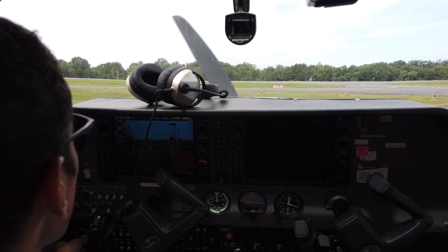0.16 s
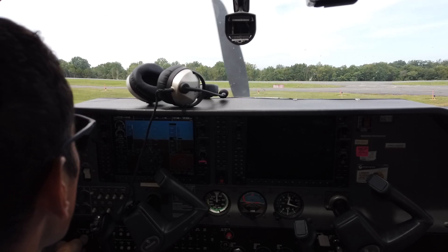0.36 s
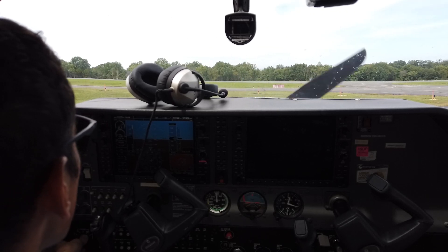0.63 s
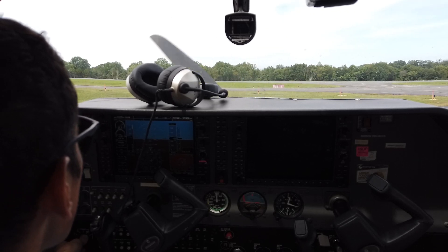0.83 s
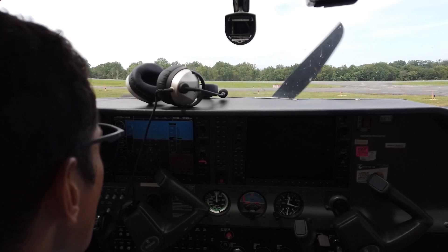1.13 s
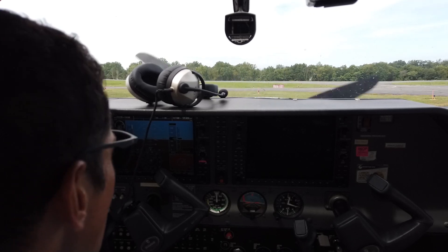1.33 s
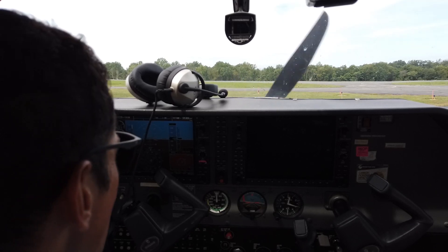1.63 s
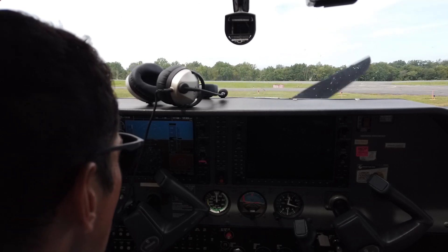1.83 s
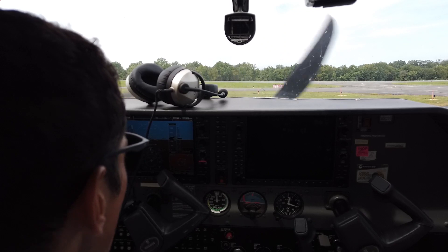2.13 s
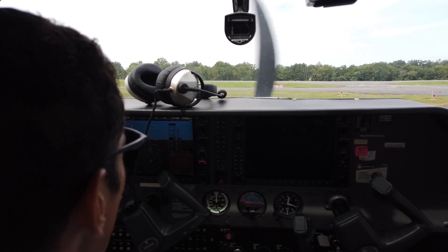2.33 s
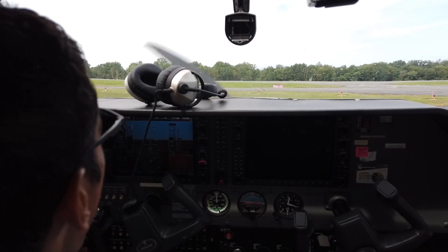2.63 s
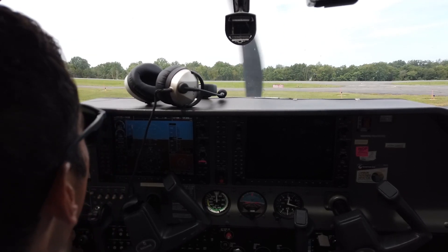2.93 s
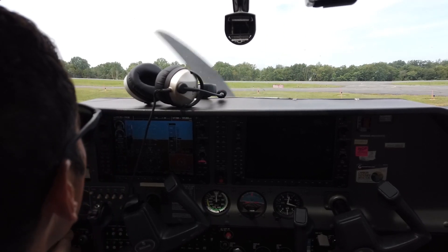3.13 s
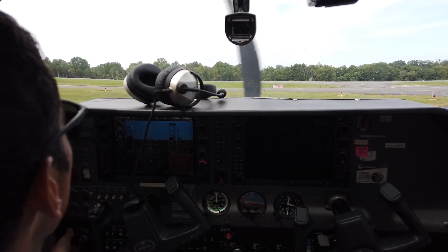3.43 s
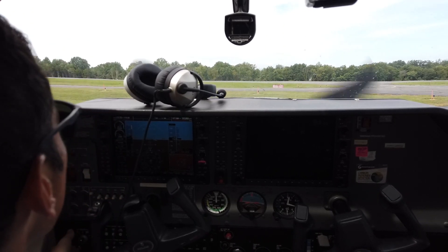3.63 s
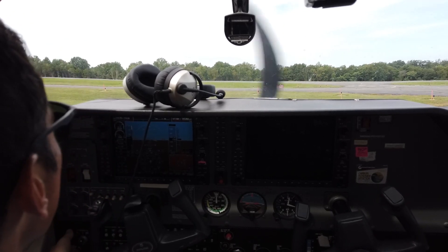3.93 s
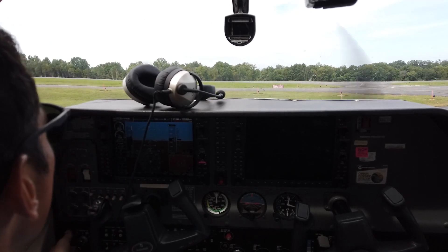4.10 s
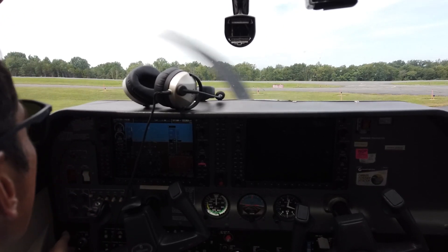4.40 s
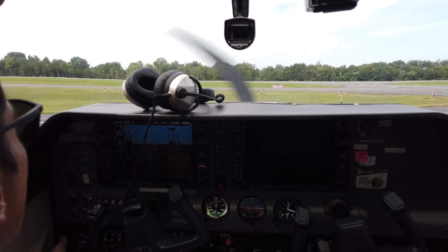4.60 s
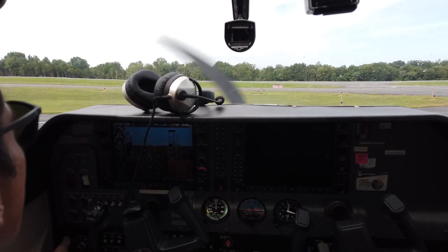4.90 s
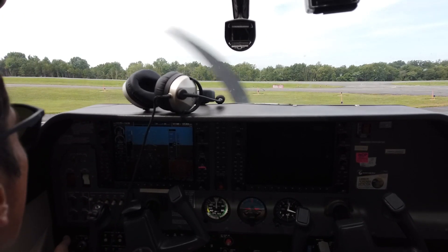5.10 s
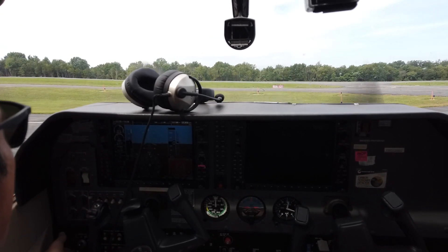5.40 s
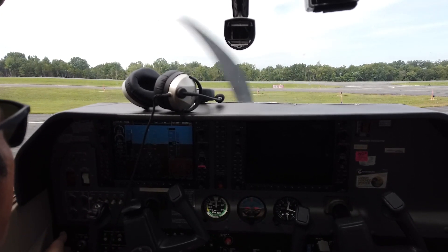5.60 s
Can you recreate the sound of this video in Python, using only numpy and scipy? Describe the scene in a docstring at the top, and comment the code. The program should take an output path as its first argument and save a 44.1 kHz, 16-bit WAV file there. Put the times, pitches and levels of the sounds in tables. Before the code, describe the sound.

In a small aircraft cabin, close behind the engine, an electric starter grinds in about six pulses a second with gear whine and airframe shudder. It releases with a metallic clack; the engine catches in thudding coughs, sags, then catches again and revs to a booming throb with rattling metal. Firing suddenly stops, the propeller coasts down and idle begins to pick up. Close stereo microphone, steady low cabin rumble.

```python
"""Inside the small cabin of a light aircraft, close behind its four-cylinder engine, for under six seconds.
First the starter grinds through one compression after another: noise, gear tones and rocking in each stroke.
At about 2.2 s it lets go and the engine catches, sags and catches again, with booms, thuds and loose metal.
It then revs up, sine orders of the firing rate throbbing under exhaust, clatter and rattle noise.
At 4.7 s the firing cuts out, the propeller coasts down and the engine picks up at idle; the cabin rumbles throughout."""
import sys
import numpy as np
from scipy import signal
from scipy.fft import rfft, irfft, next_fast_len
from scipy.io import wavfile
from scipy.ndimage import uniform_filter1d, map_coordinates

SR = 44100
rng = np.random.default_rng(int(sys.argv[2]) if len(sys.argv) > 2 else 0)


def wav_record(signal):
    """Record a signal, one row per channel, as 16-bit PCM in the file named by sys.argv[1]."""
    frames = np.transpose(np.atleast_2d(signal))
    bounded = np.clip(frames, -1, 1)
    # unit amplitude maps onto the largest positive 16-bit level
    quanta = np.round(bounded * 32767).astype(np.int16)
    wavfile.write(sys.argv[1], SR, quanta)


N = 253575

# crankshaft speed: time_s, firings_per_s
SPEED = [(2.2, 15.6), (2.62, 24.2), (2.75, 23.8), (3.32, 17.9), (3.47, 17.8), (3.79, 24.3), (4.03, 33.7),
         (4.24, 45.6), (4.51, 58.2), (4.71, 62.1), (4.92, 53.8), (5.3, 42.7), (5.52, 37.4), (5.75, 38)]
# spells of firing: start_s, end_s, throb_db, exhaust_db, clatter_db, treble_db
BURNS = [(2.215, 2.32, -11, -23.5, -35.5, -43), (2.375, 2.5, -10, -24, -34, -41),
         (2.49, 2.58, -10, -23, -33, -36), (2.6, 2.675, -4.5, -28.5, -36, -42),
         (3.175, 3.38, -18, -31, -44, -52.5), (3.385, 3.42, -1, -28, -52, -46),
         (3.51, 3.63, -35, -46, -40, -48.5), (3.615, 3.735, -1.5, -26.5, -38.5, -42),
         (3.815, 4.13, -4, -31.5, -36.5, -38), (4.1, 4.6, -2.5, -31, -37, -34.5),
         (4.56, 4.708, -1.5, -33, -38, -35.5), (5.51, 5.75, -14, -54, -53, -53.5),
         (5.6, 5.67, -3.5, -47, -42, -46.5)]
# turning over without firing: time_s, throb_db, exhaust_db, clatter_db, treble_db
COAST = [(2.2, 3, -29.5, -43, -46), (2.8, 2, -33, -46.5, -57), (3.1, 3, -32.5, -42.5, -49),
         (3.47, -1, -31, -42, -50), (4.8, -6.5, -34, -40, -56.5), (4.93, 0.5, -37, -41, -53.5),
         (5.27, 0, -40, -42.5, -61), (5.46, -6.5, -43, -44, -58.5), (5.75, 3.5, -34.5, -44, -53.5)]
# cylinders in firing order: strength_db
CYLINDERS = [-0.27, -1, -1.3, -0.12]
# engine orders: multiple of the firing rate; the halves come from unequal cylinders
ORDERS = [1, 1.5, 2, 2.5, 3]
# throb of each order: coasting_db, firing_db
ORDER_LEVELS = [(-26, -15), (-33, -25), (-32, -22), (-47, -29), (-42, -27)]
# the cabin's answer to the orders: frequency_hz, gain_db
CABIN_BOOM = [(16, -6), (22, -9), (27, -7), (33, -1), (47, 2.5), (60, 2.5), (72, -1.5), (88, 3),
              (102, -1.5), (125, -7), (180, -13)]
# single orders swell or falter as cylinders come in unevenly: multiple of the firing rate, time_s, width_s, change_db
SURGES = [(1, 3.72, .13, -4), (3, 3.7, .06, 5), (2, 3.95, .1, 5), (2.5, 4.08, .07, 8), (3, 4.42, .15, 4),
          (1, 4.435, .035, -11), (1, 4.79, .05, -3), (1, 5.68, .12, -7)]
# the muffler's colour on the higher orders: frequency_hz, gain_db
PIPE = [(50, -4), (90, 3), (125, 1.5), (160, -5.5), (200, -7.5), (260, -12.5), (340, -23.5), (480, -25.5),
        (900, -55)]
# exhaust gas noise: frequency_hz, density_db (per Hz)
EXHAUST_GAS = [(50, -20), (90, 6), (125, -5.5), (200, -8.5), (290, -20), (370, -14.5), (480, -33),
               (900, -49)]
# a narrow exhaust resonance, driven twice on the way up: time_s, width_s, level_db
GROWLS = [(4.42, .04, -31), (4.535, .04, -32.5)]
# casing resonances: frequency_hz, width_hz, gain_db
CASING = [(565, 50, 7.5), (717, 37, -5), (895, 10, 6), (1009, 2.7, 10), (1200, 6.8, -9), (1323, 8, -4),
          (2100, 17, -16)]
# clatter of pistons and valves: frequency_hz, density_db (per Hz)
CLATTER = [(160, -42), (280, -31), (368, -5), (461, -18), (564, -9), (624, -15), (685, -3.5), (988, -9),
           (1220, -11.5), (1500, -18), (1800, -27), (2340, -36), (3960, -120)]
# rattle of loose parts: frequency_hz, density_db (per Hz)
RATTLE = [(880, 3.5), (1500, -4), (1860, -2), (2030, 6.5), (2150, -2), (2440, -0.5), (2890, 0.5),
          (3910, -12), (6000, -30), (7800, -50), (13200, -120)]
# hiss above the rattle: frequency_hz, density_db (per Hz)
HISS = [(2650, -1), (4500, -4.5), (5040, -4.5), (7410, -6.5), (8520, -2), (9360, -5.5), (10600, 0.5),
        (15600, -18.5)]
# engine metal that rings under load: frequency_hz, width_hz, gain_db
COWL = [(1056, 28, -9), (1212, 45, 4), (1304, 23, -8.5), (2101, 21, -5.5), (2875, 51, -13.5)]
# ringing of that metal: time_s, level_db
LOAD = [(3.75, -45), (3.95, -36.5), (4.2, -35.5), (4.5, -40.5), (4.68, -40), (4.78, -53)]
# turbulent rumble of the uneven engine: frequency_hz, density_db (per Hz)
ROUGH_RUMBLE = [(14, -24), (25, 4), (55, 3), (90, -22), (125, -19), (180, -17), (400, -59)]
# a loose panel: frequency_hz, width_hz, gain_db
PANEL = [(260, 60, -2), (575, 70, -2), (690, 70, -3), (1030, 130, -7), (1210, 50, -2)]
# the panel's shaking: start_s, end_s, level_db
SHAKES = [(2.21, 2.44, -35), (4.375, 4.55, -33)]
# lone strong firings while the engine catches: time_s, level_db (before a common trim), boom_hz
BANGS = [(2.279, -12.5, 63.5), (2.313, -9.5, 56.3), (2.386, -28, 89), (2.509, -14, 73.8), (3.407, -14, 50),
         (3.515, -19.5, 92), (3.632, -12.5, 57), (3.716, -15, 66.6), (3.808, -22, 114), (5.528, -16, 53.2),
         (5.626, -15.5, 77.2)]
# putts of uneven firings: time_s, level_db (before the trims of ring and thud), ring_hz
PUTTS = [(2.214, -18.5, 550), (2.23, -18, 437), (2.252, -17.5, 500), (2.283, -21, 400), (2.322, -21, 494),
         (2.354, -20, 724), (2.374, -15.5, 527), (2.402, -26, 625), (2.429, -20, 564), (2.479, -28, 610),
         (2.555, -26, 417), (2.595, -27, 800), (2.672, -24, 905), (2.746, -26, 524), (2.925, -25, 546),
         (2.986, -35, 590), (3.017, -24.5, 710), (3.063, -30, 590), (3.164, -33, 620), (3.188, -22, 590),
         (3.221, -26, 890), (3.245, -28, 680), (3.314, -28, 570), (3.345, -24, 667), (3.44, -43, 640),
         (3.517, -26, 660), (3.561, -21.5, 577), (3.662, -16.5, 950), (3.792, -23, 1180), (3.835, -25, 560),
         (3.863, -24, 497), (5.56, -29, 595)]
# the puff of one firing: frequency_hz, density_db (per Hz)
CHUFF = [(120, 2), (300, 2), (550, 0.5), (1200, -2), (1600, -18), (3000, -19), (9000, -55)]
# loose knocks and chuffs: time_s, level_db (before a common trim), treble_db (relative), length_s (to fall 60 dB)
KNOCKS = [(2.113, -8.5, -28, 0.1), (2.173, -38, 6, 0.076), (2.217, -16, -22, 0.11), (2.373, -13, -16, 0.09),
          (2.425, -6, -9, 0.06), (2.753, -24.5, -28, 0.4), (2.868, -28.5, -10, 0.3),
          (2.928, -26, -29, 0.074), (3.18, -27, -8, 0.21), (3.401, -24, -2, 0.065), (3.538, -23, -22, 0.14),
          (3.663, -15.5, -9, 0.27)]
# dull part of a knock: frequency_hz, density_db (per Hz)
KNOCK = [(200, -8.5), (600, 4.5), (1250, -1.5), (1700, -11), (2300, -5.5), (3000, -27), (8000, -17),
         (15000, -40)]
# bright part of a knock: frequency_hz, density_db (per Hz)
CLINK = [(900, -30), (2200, -2), (3600, 1), (5000, -10), (8000, -11), (11000, -16), (15500, -30)]
# course of one starter stroke: share of the stroke, starter speed ratio, slackness 0-1
STROKE = [(0, 1, 1), (.14, 1.025, .35), (.27, 1.005, 0), (.45, .97, .1), (.62, .975, .25), (.8, 1.02, .35),
          (1, 1, 1)]
# the four cylinders in turn under the starter: lull_db (before the stroke), rocking_db
COMPRESSIONS = [(-21.5, -15), (-13.5, -16), (-21, -15), (-12.5, -15)]
# grinding of the starter: frequency_hz, density_db (per Hz)
GRIND = [(130, -50), (220, -5), (245, -12.5), (362, -5.5), (473, -32), (565, 4), (640, -23), (914, -7.5),
         (1020, -19), (1240, -8.5), (1830, -16.5), (3800, -24.5), (7470, -31.5), (10700, -25), (15500, -41)]
# gear tones: pitch_hz (at speed ratio 1), level_db, swell centre and swell width (shares of the stroke)
WHINE = [(580.5, 2.5, 0.3, 0.1), (548.5, -5, 0.534, 0.097), (717, -26.5, 0.68, 0.035),
         (827, -3.5, 0.56, 0.1), (906, 2.5, 0.25, 0.098), (921, -6, 0.59, 0.12), (990, -8, 0.51, 0.17),
         (1192, -2, 0.23, 0.086), (1290, -7, 0.54, 0.11), (1387, -1, 0.462, 0.064), (1350, -12, 0.8, 0.048),
         (1580, -6, 0.36, 0.042), (1646, -21, 0.15, 0.092), (1623, -9, 0.25, 0.08),
         (3590, -21.5, 0.15, 0.13), (1930, -21, 0.8, 0.51), (2040, -28, 0.594, 0.022),
         (2255, -8.5, 0.29, 0.056), (2314, -23, 0.72, 0.04), (2900, -14.5, 0.58, 0.13),
         (2800, -19.5, 0.74, 0.059)]
# the starter motor itself: frequency_hz, density_db (per Hz)
WHIRR = [(500, -26), (1500, -2), (1970, 2), (2150, -11), (2330, -6), (2600, -10), (2850, -5), (3300, -9.5),
         (6000, -12.5), (10500, -23), (15500, -34)]
# clack of the gears in each stroke: level_db
BITE_DB = [-13.5, -18, -16, -46, -13, -52, -11, -41, -14.5, -11.5, -15, -50, -14.5]
# the gear case rung by the slack teeth: frequency_hz, width_hz, gain_db
GEAR_CASE = [(565, 59, -6), (734, 74, 3), (967, 70, 1), (1127, 50, 1.5), (1228, 34, 2), (1385, 28, -3),
             (2020, 110, -7.5), (2280, 61, -9.5), (2570, 54, -17), (2800, 25, -19), (4240, 400, -20)]
# contact noise of the teeth: frequency_hz, density_db (per Hz)
TOOTH_CONTACT = [(100, 0), (3000, 0), (6000, -5), (15000, -10)]
# pinion contacts just before the engine catches: time_s, level_db, ring_hz
KICKS = [(2.122, -20, 3570), (2.126, -30, 2900), (2.137, -20.5, 2110)]
# the starter spinning free: start_s, end_s, level_db
SPIN_OFF = [(2.176, 2.22, -43.5)]
# hiss of that spin: frequency_hz, density_db (per Hz)
SPIN_HISS = [(3000, -22), (6000, -7), (9500, -2), (13000, -6), (15500, -11)]
# airframe on the engine mounts: frequency_hz, width_hz, gain_db
ROCKING = [(23.8, 14.3, 2.5), (38, 16, 2.5), (60.7, 21, -8.5), (82.6, 5.7, -7), (124, 27, -13)]
# shudder of the airframe while cranking: frequency_hz, density_db (per Hz)
SHUDDER = [(15, 3.5), (24, 6.5), (35, 8.5), (48, 1.5), (80, -11.5), (130, -8.5), (200, -15.5), (300, -28.5), (500, -88)]
# background in the cabin: frequency_hz, density_db (per Hz)
CABIN = [(12, -18), (22, 5), (54, -1), (315, -14), (565, -5.5), (631, -8.5), (1230, -19.5), (1720, -27.5),
         (4550, -74), (10800, -38), (15500, -57)]
# stereo spread of every noise: frequency_hz, side_db (re mid)
WIDTH = [(60, -32.5), (110, -27), (200, -38), (380, -16), (700, -21), (1290, -4), (2380, -4), (4400, -2),
         (8120, -2), (15000, -2)]

CATCH_RATE = 27  # firings per s: reference speed for the level slopes and the unevenness
TREBLE_DB_PER_OCTAVE, EXHAUST_DB_PER_OCTAVE = -10, 6.5  # of firing, per octave of speed
GAS_DB_PER_OCTAVE = -3.5  # gas flows more smoothly above the reference speed
HISS_DB_PER_OCTAVE = -1  # hiss against rattle, per octave of speed
BURN_ATTACK_S, BURN_T60, THROB_T60 = 0.02, 0.19, .09  # s: the throb stops soonest after firing
TICK_T60, TICK_SCATTER_DB = .05, 1.4  # s, dB
GRAIN_RATE, GRAIN_T60, GRAIN_SPREAD_DB, GRAIN_SMOOTH = 105, .035, 2.4, 1.1  # per s, s, dB, steady share
MODE_FLUTTER_DB, MODE_FLUTTER_RATE = 2.5, 22  # dB, per s
GROWL_HZ = 568.4
FIRST_STROKE_S, STROKE_S = -.042, .1715  # first compression, and the time from one to the next (s)
RELEASE_S, RUN_DOWN_T60 = 2.175, 0.099  # the starter lets go and runs down (s)
RACING_LULL = 0.21  # share of the lull (in dB) left while the starter races
BRUSH_HZ, ARMATURE_HZ = 10880, 113
BACKLASH_S, BACKLASH_T60 = 0.1072, 0.19  # time into a stroke, decay (s)
TAKE_UP_HZ, TAKE_UP_S, TAKE_UP_T60, TAKE_UP_DB = 695, 0.0017, 0.052, -46  # Hz, s into a stroke, s, dB before lull
KICK_T60, KICK_WIDTH_HZ = 0.022, 600  # s, Hz
TOP_HZ = 15750


def engine(casing_db=-3, clatter_db=-4, rattle_db=0.0, hiss_db=-2.14, steady=3):
    """Every firing puffs from the exhaust; pistons and valves clatter in step with it."""
    t = clock()
    rate, = curves(SPEED, t)
    exhaust_level, clatter_level, treble_level = effort(rate)
    running = np.clip((t - 2.205) / 0.034, 0, 1)
    cycle = np.cumsum(rate) / SR  # firings so far
    beat = ticking(cycle)
    grain = chatter(GRAIN_RATE, GRAIN_T60, GRAIN_SPREAD_DB, GRAIN_SMOOTH)
    gate = levelled((steady + beat) * grain)
    casing = amp(casing_db) * fluttering(gate * rng.standard_normal(N), CASING)
    clatter = amp(clatter_level) * (casing + amp(clatter_db) * gate * rush(CLATTER))
    rattle_gate = levelled((7 + beat) * (.5 + grain))
    rattle = amp(treble_level + rattle_db) * rattle_gate * rush(RATTLE)
    hiss_slope_db = HISS_DB_PER_OCTAVE * np.log2(rate / CATCH_RATE)
    hiss_gate = levelled((6 + beat) * (1 + grain))
    hiss = amp(treble_level + hiss_db + hiss_slope_db) * hiss_gate * rush(HISS)
    puffs = amp(exhaust_level) * exhaust(cycle, rate, levelled(2.0 + beat))
    mechanical = clatter + rattle + hiss + buzz(beat) + labour(beat, exhaust_level, rate)
    return running * (throb(cycle, rate) + puffs + growl(cycle) + mechanical)


def ticking(cycle):
    """Each firing knocks the engine, and valves seat halfway between the firings."""
    t = clock()
    counts = np.arange(1, int(cycle[-1]))
    fired = np.interp(counts, cycle, t)
    seated = np.interp(counts + .5, cycle, t)
    scatter = lambda: TICK_SCATTER_DB * rng.standard_normal(len(counts))
    ticks = blows(fired, amp(np.resize(CYLINDERS, len(fired)) + scatter()))
    ticks = ticks + blows(seated, amp(5.0 + scatter()))
    return levelled(dying(ticks, TICK_T60))


def effort(rate):
    """Exhaust, clatter and treble (dB): coasting plus firing, whose treble falls and exhaust gains with speed."""
    octaves = np.log2(rate / CATCH_RATE)
    _, puff, clatter, treble = spells(BURNS, BURN_T60)
    _, *coasting = curves(COAST, clock())
    firing = [puff * amp(EXHAUST_DB_PER_OCTAVE * octaves), clatter, treble * amp(TREBLE_DB_PER_OCTAVE * octaves)]
    return 20 * np.log10(np.hypot(firing, amp(coasting)))


def unevenness(rate):
    """1 while the engine is catching, much less once it runs fast."""
    return np.minimum(CATCH_RATE / rate, 1) ** 2


def throb(cycle, rate, waver_db=5.0, stagger=0.065):
    """The lowest orders shake the cabin as pressure waves: unevenly while catching, more steadily at speed."""
    t, rough = clock(), unevenness(rate)
    firing = spells(BURNS, THROB_T60)[0]
    coasting = amp(curves(COAST, t)[0])
    out = np.zeros(N)
    turn = cycle + stagger * rough * np.sqrt(firing) * wobble(22)  # uneven firing instants
    for k, (coast_db, fire_db) in zip(ORDERS, ORDER_LEVELS):
        surge_db = sum(db * np.exp(-((t - s) / width) ** 2) for order, s, width, db in SURGES if order == k)
        level = np.hypot(coasting * amp(coast_db), firing * amp(fire_db)) * along(CABIN_BOOM, k * rate)
        waver = amp(waver_db * rough * wobble(15) + surge_db)
        out += level * waver * np.sin(2 * np.pi * k * turn)
    return np.sqrt(2) * out


def exhaust(cycle, rate, gate, lines_db=-6.0, gas_db=0.5, half_db=-6, waver_db=5.0):
    """The muffler smears the puffs into wavering higher orders and turbulent gas."""
    lines = np.zeros(N)
    for k in np.arange(3.5, 10, .5):
        # half orders are weaker than whole ones
        strength = along(PIPE, k * rate) * amp(2 * (k % 1) * half_db + waver_db * wobble(14))
        lines += strength * np.sin(2 * np.pi * (k * cycle + rng.random()))
    gas_slope_db = GAS_DB_PER_OCTAVE * np.log2(np.maximum(rate / CATCH_RATE, 1))
    gas = amp(gas_db + gas_slope_db) * gate * rush(EXHAUST_GAS)
    return amp(lines_db) * levelled(lines) + gas


def growl(cycle, tone_db=0, waver_hz=8.7, depth=.7):
    """The firing pulses drive one narrow exhaust resonance, which beats twice per firing."""
    t = clock()
    level = sum(amp(db) * np.exp(-((t - s) / width) ** 2 / 2) for s, width, db in GROWLS)
    tone = np.sin(2 * np.pi * np.cumsum(GROWL_HZ + waver_hz * wobble(60)) / SR)
    return amp(tone_db) * level * tone * (1 + depth * np.sin(4 * np.pi * cycle))


def labour(beat, exhaust_level, rate, rumble_db=-2, steady=1.0):
    """Under load firings ring the engine metal; a rumble follows the exhaust, strongest when running unevenly."""
    metal = levelled(fluttering((steady + beat) * rng.standard_normal(N), COWL))
    rumble = amp(exhaust_level + rumble_db) * unevenness(rate) * rush(ROUGH_RUMBLE)
    return amp(curves(LOAD, clock())[0]) * metal + rumble


def buzz(beat, dull_hz=1700, steady=3):
    """A loose panel, shaken by the ticking engine, buzzes at the first firings and again as it revs up."""
    dull = lambda hz: 1 / (1 + (hz / dull_hz) ** 4)
    shake = filtered((steady + beat) * rng.standard_normal(N), dull)
    return spells(SHAKES, BURN_T60)[0] * unit(ring(shake, PANEL))


def bangs(t60=0.42, boom_db=2):
    """Lone firings boom through the cabin, swelling over the first half cycle."""
    t, out = clock(), np.zeros(N)
    for s, db, hz in BANGS:
        age = np.maximum(t - s, 0)
        swell = 1 - np.exp(-(np.pi * age * hz) ** 2)
        out += amp(db + boom_db - 60 * age / t60) * swell * np.sin(2 * np.pi * hz * age)
    return out


def putts(ring_db=-5, thud_db=-7, ring_t60=0.045, thud_t60=0.055, rise=0.0015):
    """Each uneven firing gives a short dry thud and rings a part of the casing."""
    times, db, _ = np.transpose(PUTTS)
    thud = dying(blows(times, amp(db)), thud_t60)
    return amp(ring_db) * pings(PUTTS, ring_t60, rise) + amp(thud_db) * thud * rush(CHUFF)


def clacks(knock_db=-11, clink_db=-9, rise=0.0061):
    """Loose metal knocks as the engine catches: noise bursts, part dull and part bright."""
    t, knock, clink = clock(), np.zeros(N), np.zeros(N)
    for s, db, treble_db, length in KNOCKS:
        age = np.maximum(t - s, 0)
        burst = amp(db - 60 * age / length) * (1 - np.exp(-age / rise))
        knock += burst
        clink += burst * amp(treble_db)
    return amp(knock_db) * knock * rush(KNOCK) + amp(clink_db) * clink * rush(CLINK)


def starter(grind_db=-35.5, gear_db=-35.5, brush_db=-55, whirr_db=-53, jitter=0.0081, flutter_db=3.5):
    """Each compression loads and slows the starter; past top centre its gears run slack."""
    t = clock()
    # from the first loose knock on, the starter races with little lull
    lull_db = curves(strokes(), t)[0] * np.where(t < KNOCKS[0][0], 1, RACING_LULL)
    share = (t - FIRST_STROKE_S) / STROKE_S % 1
    speed, slack = curves(STROKE, share)
    # the gear tones bend with the speed, each swelling at its own part of the stroke
    gears = np.zeros(N)
    for hz, db, centre, width in WHINE:
        pitch = hz * speed * (1 + jitter * wobble(150) + 0.00795 * wobble(14))
        phase = 2 * np.pi * np.cumsum(pitch) / SR
        distance = (share - centre + .5) % 1 - .5
        swell = np.exp(-(distance / width) ** 2 / 2)
        gears += amp(db + flutter_db * wobble(90)) * swell * np.sin(phase)
    # the spinning armature shakes the gears, which adds sidebands
    spin = 2 * np.pi * np.cumsum(ARMATURE_HZ * speed * (1 + wobble(39.3) / 20)) / SR
    gears = gears * (1 + np.sin(spin) / 2)
    # the motor's brushes whistle as it takes up the load
    whistle_hz = BRUSH_HZ * (1 + .005 * wobble(400) - .02 * (share - .2))
    whistle = np.sin(2 * np.pi * np.cumsum(whistle_hz) / SR)
    brushes = whistle * amp(5.2 * wobble(120)) * np.exp(-((share - .22) / 0.22) ** 2)
    grind = amp(slack * lull_db + 0.93 * wobble(69.6)) * chatter() * rush(GRIND)
    noises = amp(grind_db) * grind + amp(whirr_db) * rush(WHIRR)
    tones = amp(gear_db) * gears + amp(brush_db) * brushes
    return cranking() * (noises + tones)


def strokes():
    """One row per compression under the starter: its start (s), then lull and rocking (dB) of its cylinder."""
    count = len(BITE_DB)
    starts = FIRST_STROKE_S + STROKE_S * np.arange(count)
    return np.column_stack([starts, np.resize(COMPRESSIONS, (count, 2))])


def cranking():
    """Gain of the starter: full until it lets go, then dying away."""
    return amp(-60 * np.maximum(clock() - RELEASE_S, 0) / RUN_DOWN_T60)


def backlash(ring_db=-9.5, scrape_db=-24, rise=0.0076):
    """Past each top centre the slack gear teeth rattle together and ring their case."""
    t, force = clock(), np.zeros(N)
    for s, db in zip(strokes()[:, 0] + BACKLASH_S, BITE_DB):
        age = np.maximum(t - s, 0)
        force += amp(db - 60 * age / BACKLASH_T60) * (1 - np.exp(-age / rise))
    teeth = chatter(rate=170, t60=.028, spread_db=2, smooth=1.3)
    contact = teeth * rush(TOOTH_CONTACT)
    case = ring(force * contact, GEAR_CASE) / np.std(ring(contact, GEAR_CASE))
    return amp(ring_db) * case + amp(scrape_db) * force * teeth * rush(KNOCK)


def take_up(rise=0.0053):
    """The deeper the lull before a stroke, the harder the gears ring as they close again."""
    rows = [(s + TAKE_UP_S, TAKE_UP_DB - lull_db, TAKE_UP_HZ) for s, lull_db, _ in strokes()[1:]]
    return pings(rows, TAKE_UP_T60, rise)


def kick():
    """The starter pinion strikes its gear just before the engine catches and rebounds, each contact ringing lower."""
    out = np.zeros((2, N))
    for s, db, hz in KICKS:
        metal, mode = rush(CLINK), [(hz, KICK_WIDTH_HZ, 0)]
        strike = dying(blows(np.array([s]), [amp(db)]), KICK_T60)
        out += ring(strike * metal, mode) / np.std(ring(metal, mode))
    return out


def spin_off():
    """The unloaded starter hisses just before the engine takes over."""
    return spells(SPIN_OFF, BURN_T60)[0] * rush(SPIN_HISS)


def rocking(lag=0.096, push_db=50, rebound_db=-5, rebound_lag=0.075, lead_db=-6, lead=0.0264,
            shudder_db=-25, soft_hz=120):
    """Each compression shoves the airframe: as the piston climbs, at top centre and on the rebound."""
    starts, _, db = strokes().T

    def push(delay, more_db):
        sizes = amp(db + more_db + rng.normal(0, 1, len(db)))
        return blows(starts + delay, sizes * (starts + delay > 0))

    shoves = push(lag, 0) + push(lag + rebound_lag, rebound_db) + push(lag - lead, lead_db)
    # rubber mounts round off every shove
    shoves = filtered(shoves, lambda hz: np.exp(-(hz / soft_hz) ** 2))
    return amp(push_db) * ring(shoves, ROCKING) + amp(shudder_db) * cranking() * rush(SHUDDER)


def cabin(level_db=-42):
    """The low rumble all around the cabin: steady shaped noise."""
    return amp(level_db) * rush(CABIN)


def amp(db):
    """Decibels to gain."""
    return 10 ** (np.asarray(db) / 20)


def unit(x):
    """x at rms 1."""
    return x / np.sqrt(np.mean(x ** 2) + 1e-20)


def clock():
    """The time of every sample (s)."""
    return np.arange(N) / SR


def along(points, hz):
    """Gain of (Hz, dB) points on a log axis."""
    f, db = np.transpose(points)
    return amp(np.interp(np.log(hz + 1), np.log(f + 1), db))


def curves(rows, at):
    """Each column after the first, read at the given places."""
    s, *cols = np.transpose(rows)
    return [np.interp(at, s, c) for c in cols]


def wobble(rate):
    """A smooth random curve, rate knots a second."""
    knots = rng.standard_normal(int(N * rate / SR) + 4)
    places = np.arange(0, len(knots) - 1, 1 / 10)
    return np.interp(clock() * rate, places, map_coordinates(knots, [places]))


def filtered(x, response):
    """x times a response of frequency."""
    size = next_fast_len(N + SR)
    return irfft(rfft(x, size) * response(np.fft.rfftfreq(size, 1 / SR)), size)[..., :N]


def ring(x, modes):
    """x through a set of resonances (Hz, width Hz, dB)."""
    def response(f):
        return sum(amp(db) * 1j * f * w / (c * c - f * f + 1j * f * w) for c, w, db in modes)
    return filtered(x, response)


def fluttering(x, modes):
    """x through resonances whose strengths waver independently."""
    waver = lambda: amp(MODE_FLUTTER_DB * wobble(MODE_FLUTTER_RATE))
    return unit(sum(waver() * ring(x, [mode]) for mode in modes))


def rush(spectrum):
    """Stereo noise, mid at rms 1: alike in the bass, diffuse in the treble."""
    mid, side = filtered(rng.standard_normal((2, N)), lambda hz: along(spectrum, hz))
    side = filtered(side, lambda hz: along(WIDTH, hz))
    return np.array([mid + side, mid - side]) / np.std(mid)


def blows(times, sizes):
    """A train of impulses."""
    return np.bincount(np.clip(times * SR, 0, N).astype(int), sizes, N + 1)[:N]


def dying(train, t60):
    """An envelope that jumps at each impulse and dies away."""
    return signal.lfilter([1], [1, -amp(-60 / (t60 * SR))], train)


def levelled(x, span=1.0):
    """x with its slow level, averaged twice over span seconds, brought to about rms 1."""
    width = int(span * SR)
    power = uniform_filter1d(uniform_filter1d(x ** 2, width), width)
    return x / np.sqrt(np.abs(power) + np.mean(x ** 2) / 1000)


def chatter(rate=260, t60=0.028, spread_db=4, smooth=13.0):
    """The coarse grain of gear teeth or loose parts striking at uneven strengths."""
    count = int(rate * N / SR)
    times, sizes = np.transpose(rng.standard_normal((count, 2)))
    hits = blows((np.arange(count) + times / 2) / rate, amp(spread_db * sizes))
    return unit(smooth + unit(dying(hits, t60)))


def spells(rows, t60):
    """One gain curve per level column: each spell rises, holds until its end and dies away."""
    t = clock()

    def shape(start, end):
        return np.clip((t - start) / BURN_ATTACK_S, 0, 1) * amp(-60 * np.maximum(t - end, 0) / t60)

    return np.max([np.outer(amp(levels), shape(start, end)) for start, end, *levels in rows], axis=0)


def pings(rows, t60, rise):
    """Short damped tones from (s, dB, Hz) rows."""
    age, out = np.arange(SR // 4) / SR, np.zeros(N + SR)
    for s, db, hz in rows:
        envelope = amp(db - 60 * age / t60) * (1 - np.exp(-age / rise))
        out[int(max(s, 0) * SR):][:len(age)] += envelope * np.sin(2 * np.pi * hz * age)
    return out[:N]


def scene():
    """Engine and starter, close ahead, over the low rumble of the cabin."""
    running = engine() + bangs() + putts() + clacks()
    cranked = starter() + backlash() + take_up() + kick() + spin_off() + rocking()
    return running + cranked + cabin()


def record(dry):
    """The microphone in the cabin drops the deepest rumble and everything above its band limit."""
    return filtered(dry, lambda hz: (hz < TOP_HZ) * hz ** 2 / (hz ** 2 + 8 ** 2))


dry = scene()
out = record(dry)
wav_record(out)
```